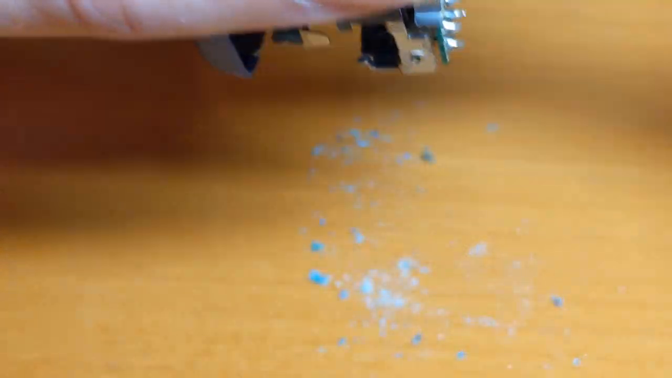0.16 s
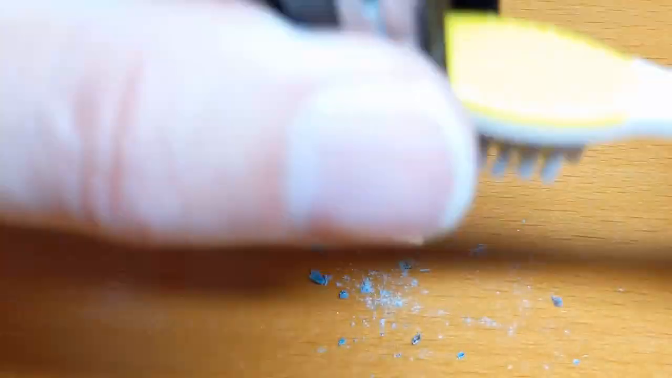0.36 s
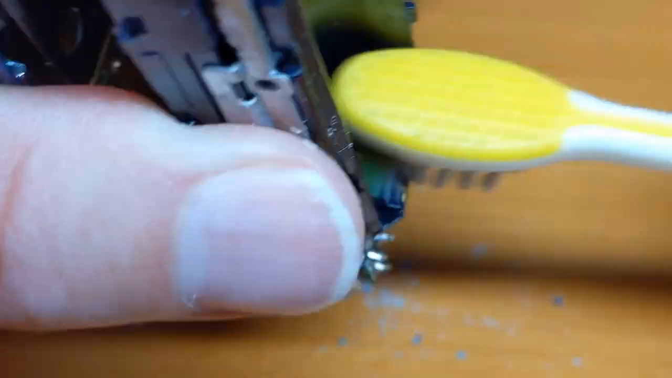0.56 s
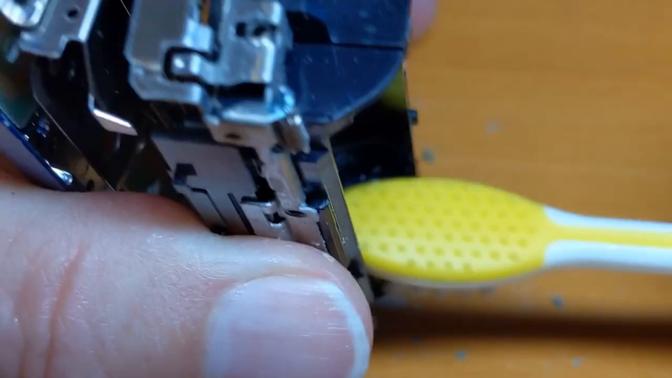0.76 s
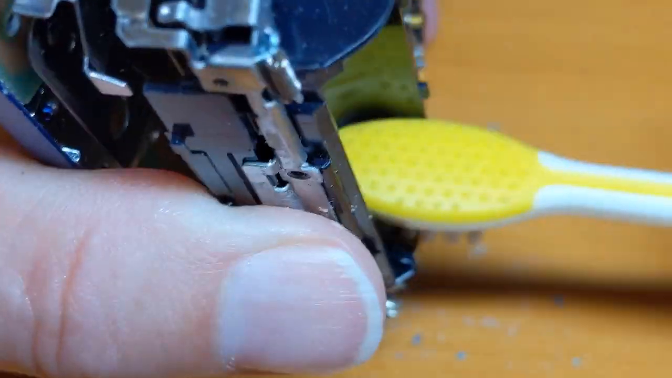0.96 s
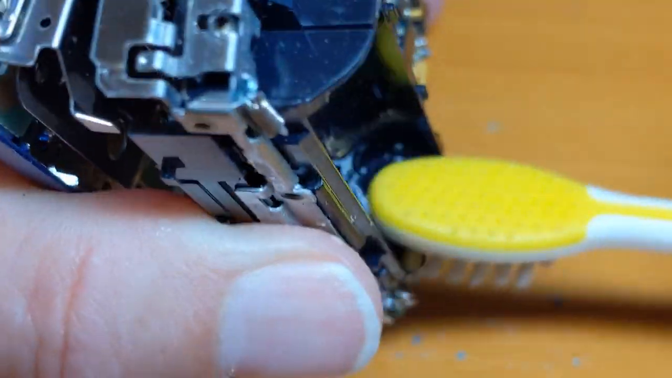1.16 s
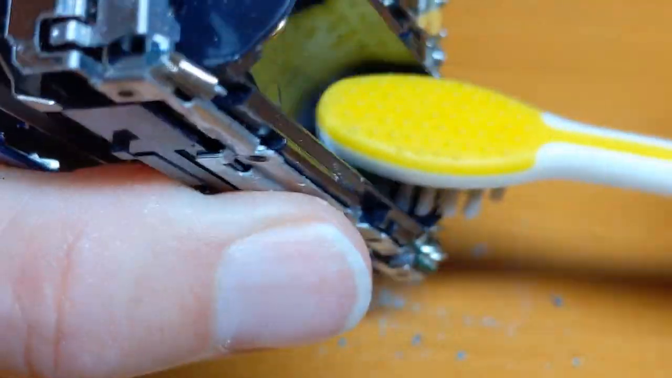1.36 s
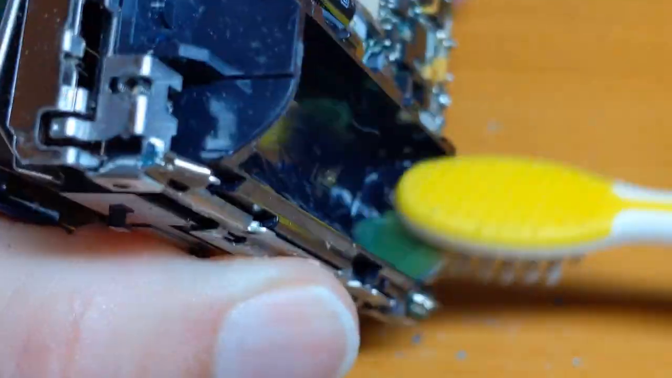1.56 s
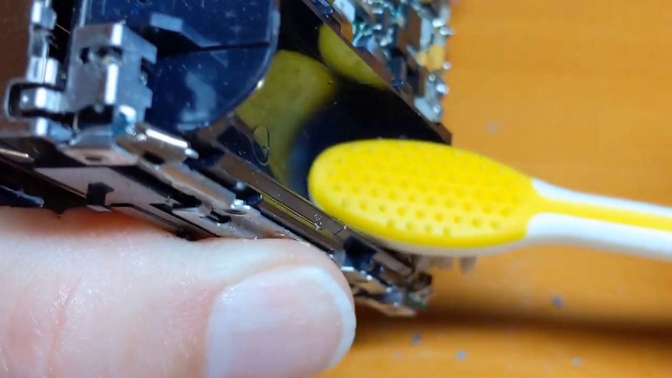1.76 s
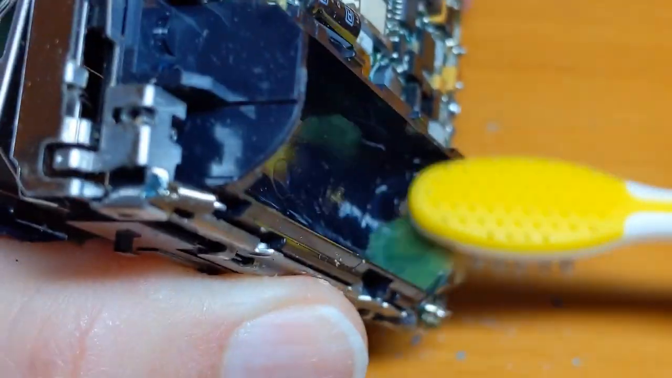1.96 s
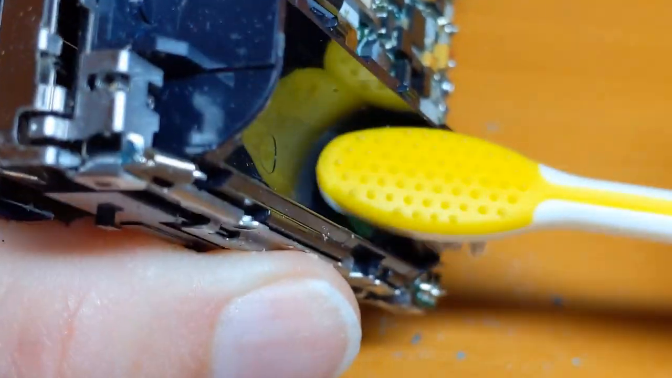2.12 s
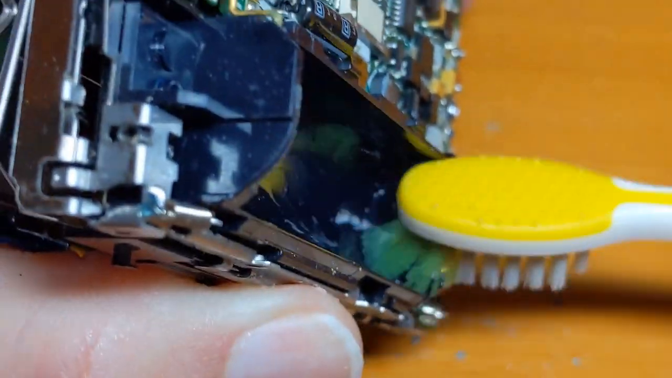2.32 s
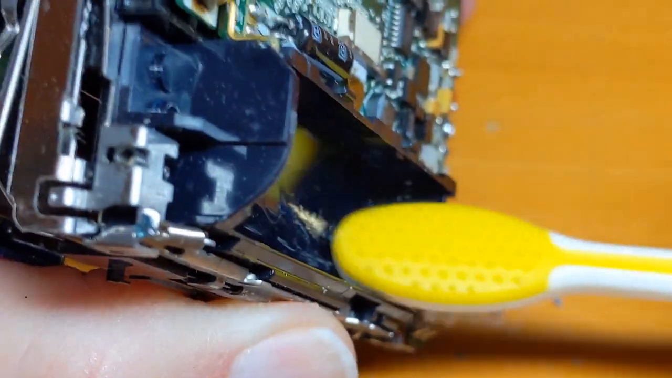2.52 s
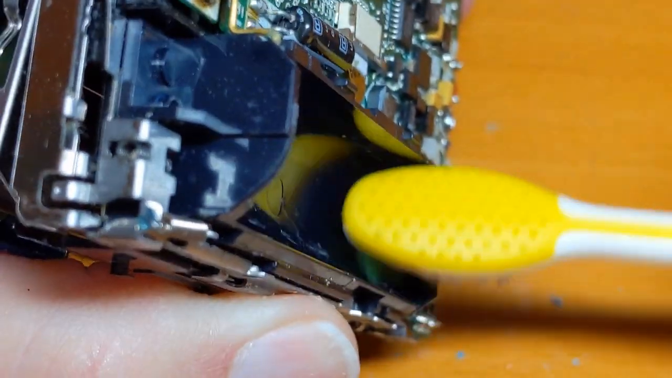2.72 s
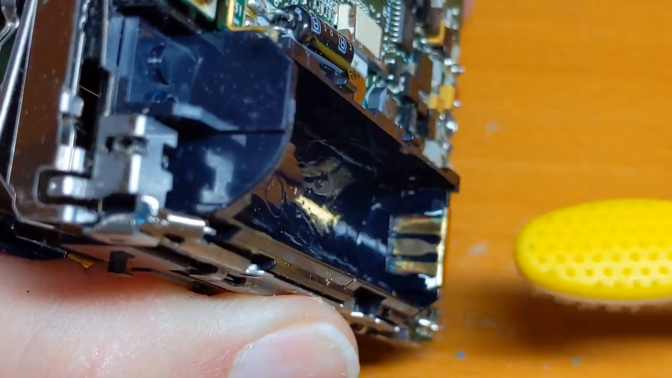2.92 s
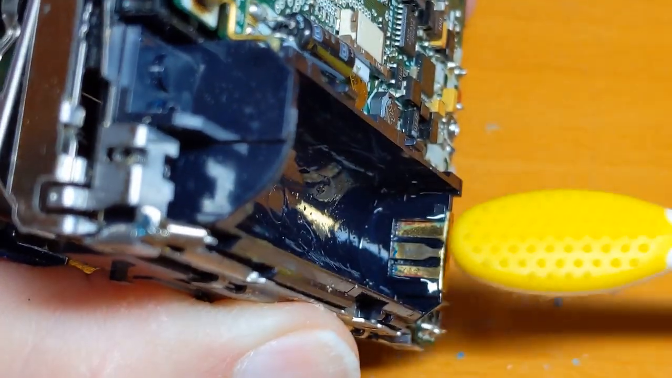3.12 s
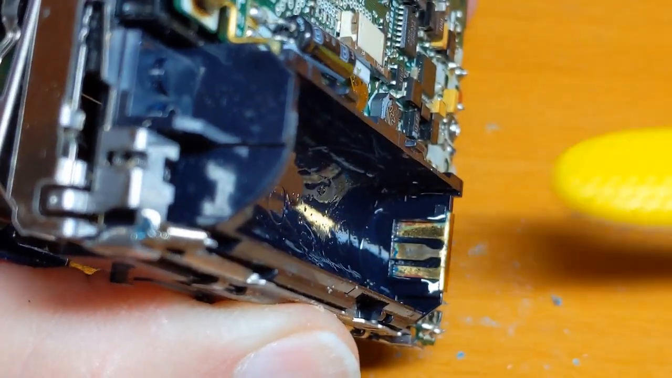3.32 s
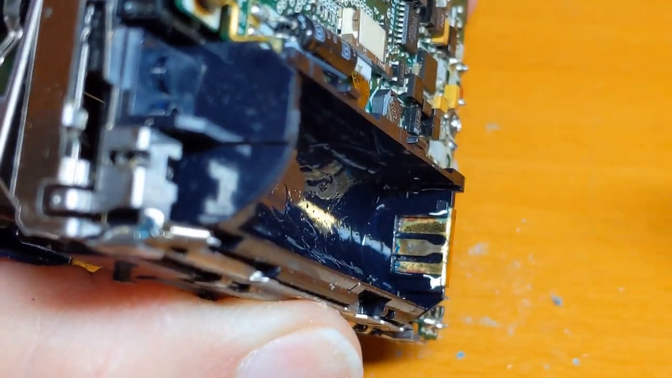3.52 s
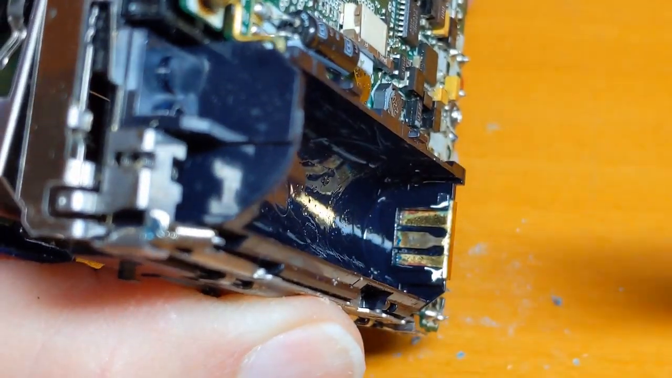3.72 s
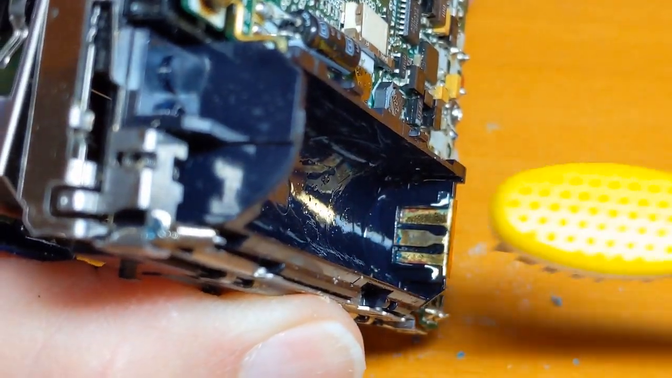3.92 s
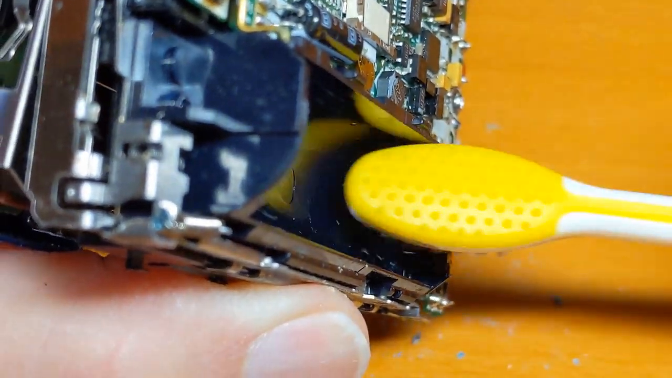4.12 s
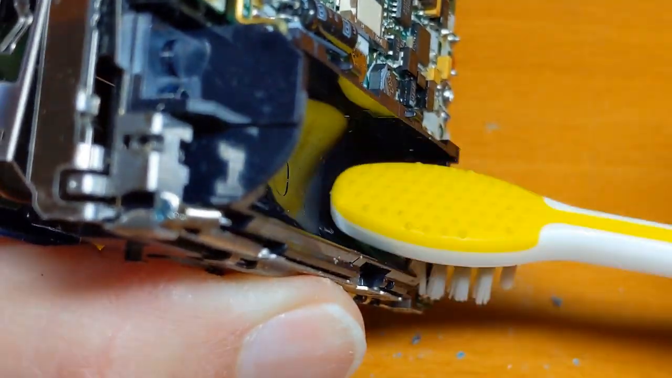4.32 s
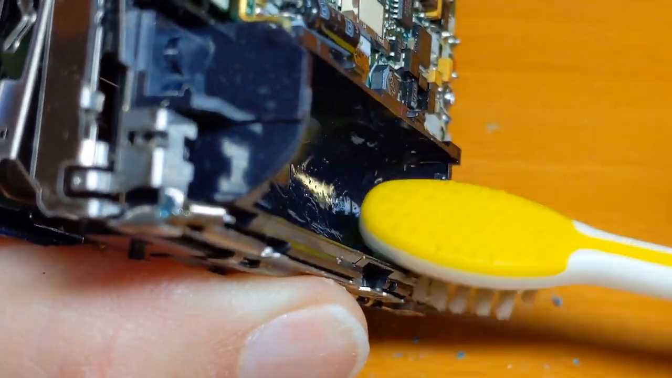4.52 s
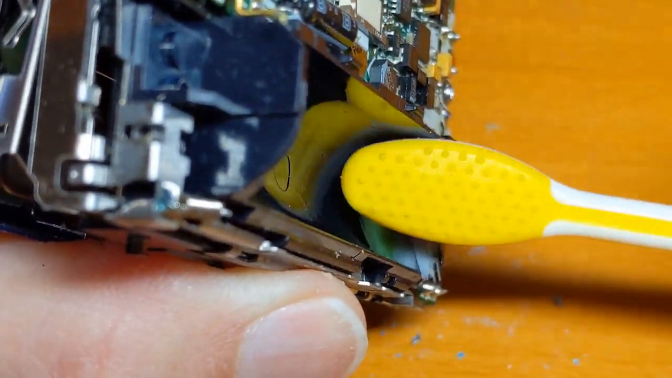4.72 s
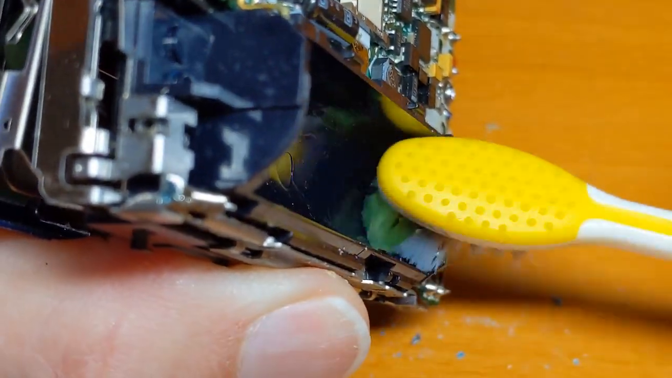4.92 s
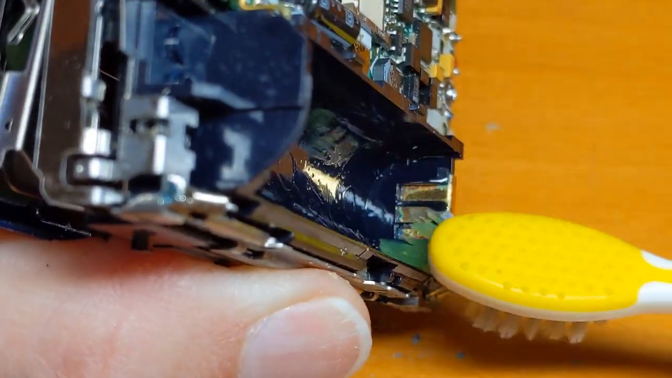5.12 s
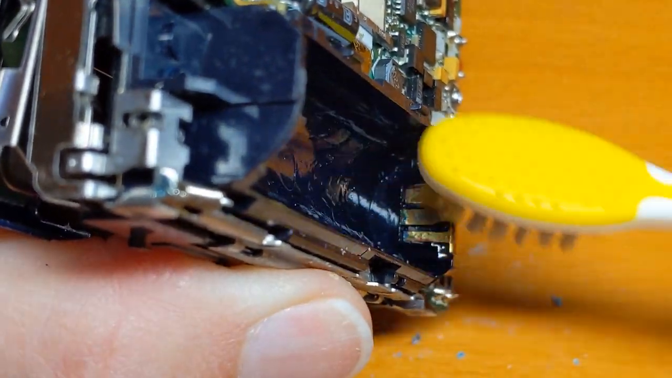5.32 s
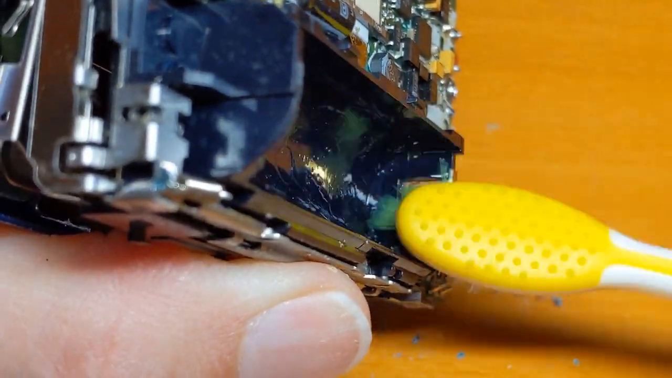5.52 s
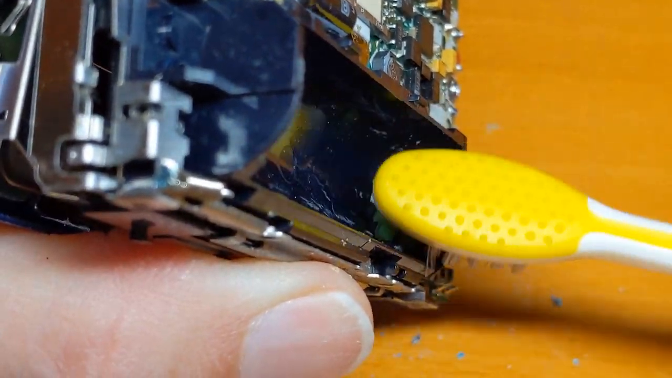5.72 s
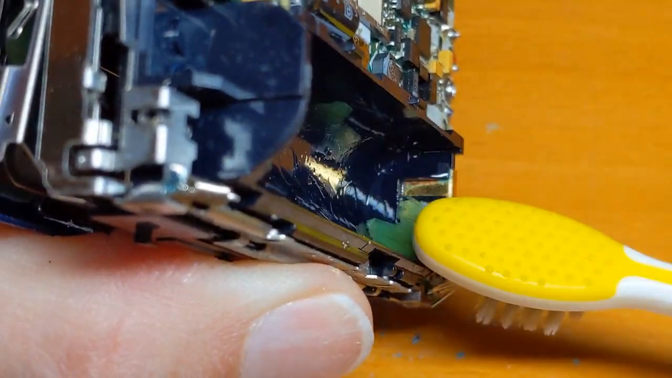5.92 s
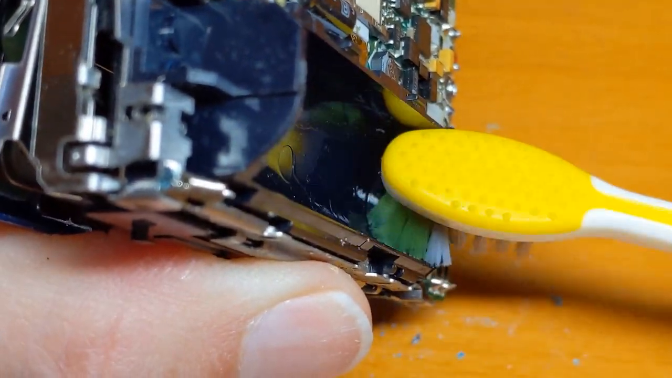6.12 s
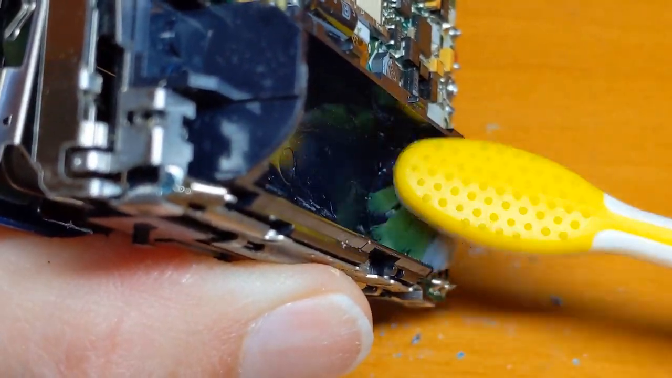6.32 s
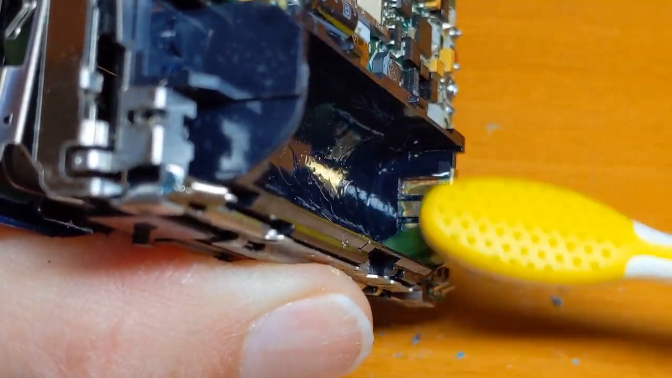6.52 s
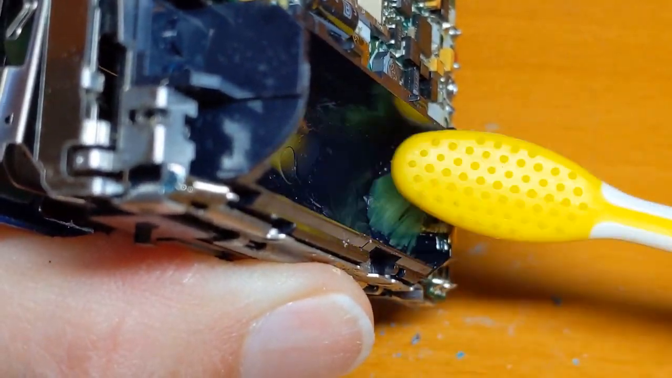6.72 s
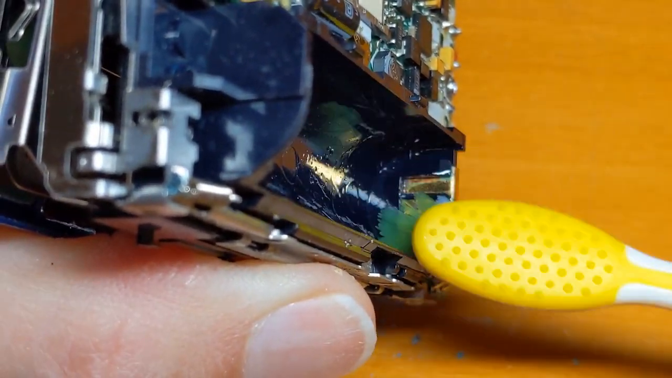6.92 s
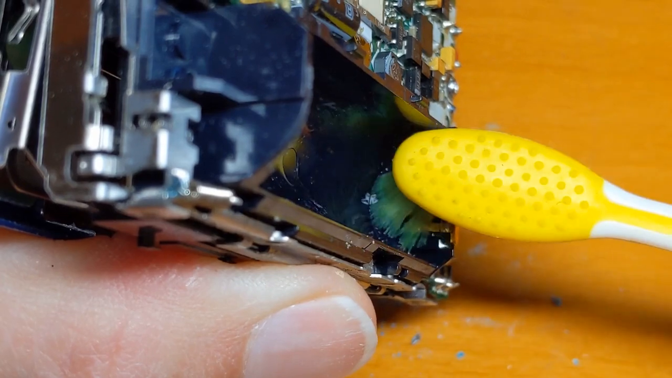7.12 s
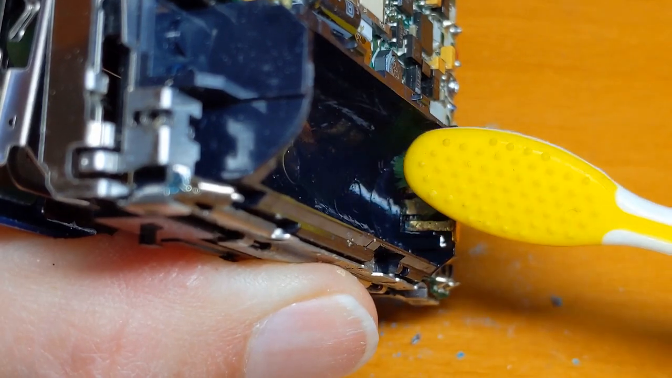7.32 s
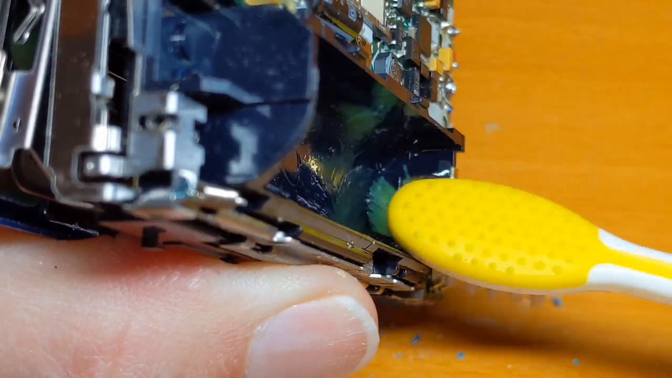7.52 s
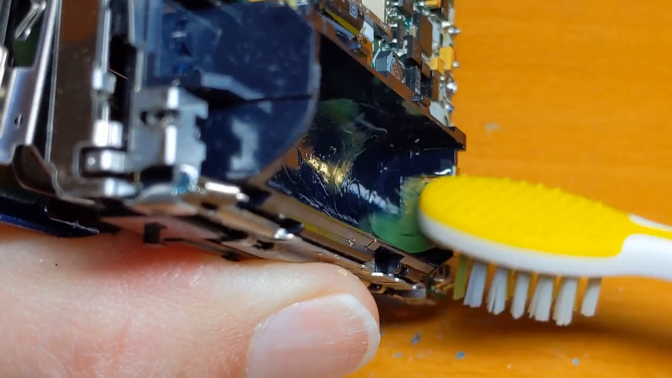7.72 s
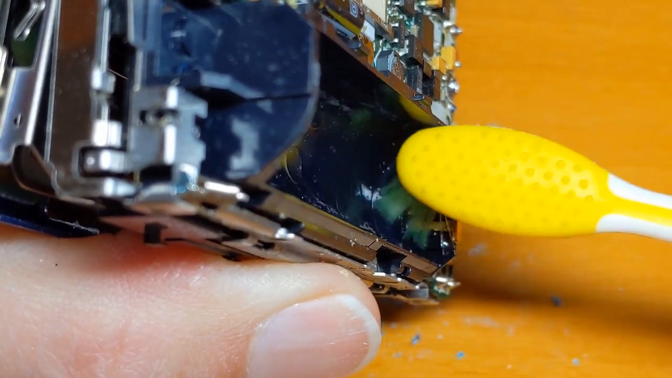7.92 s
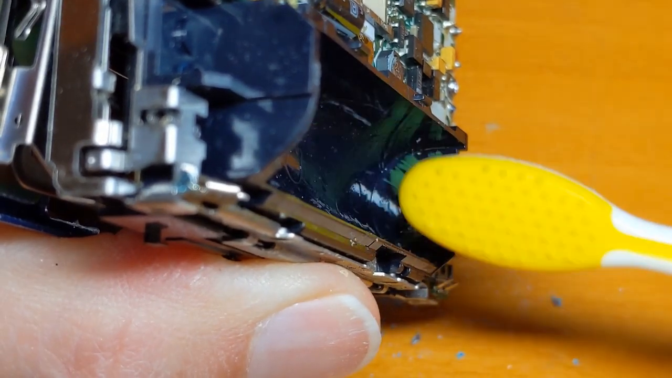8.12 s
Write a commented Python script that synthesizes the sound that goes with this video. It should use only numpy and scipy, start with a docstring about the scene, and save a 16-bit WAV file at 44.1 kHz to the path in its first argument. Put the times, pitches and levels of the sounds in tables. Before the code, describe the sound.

Fast, dry, bright brushing on a small metal chassis, full of ticks and springy clicks, with a pause midway and one wooden bump.

```python
"""A toothbrush scrubs the spring contacts of a small metal chassis held over a wooden bench.
Its bristles snap free at random and set the metal ringing; tufts flick off edges in short showers of snaps.
The head knocks the chassis, plucked springs ring as dying tones, and the chassis once bumps the bench.
The head and bristles chirp briefly as gliding tones. Shaped noise makes a quiet room's hum and hiss."""
import sys
import numpy as np
from scipy import signal
from scipy.fft import rfft, irfft
from scipy.io import wavfile

SR = 44100
rng = np.random.default_rng(int(sys.argv[2]) if len(sys.argv) > 2 else 0)


def waveform_to_disk(signal):
    """Save audio, clipped to [-1, 1], as 16-bit WAV at the path in sys.argv[1]."""
    frames = np.transpose(np.atleast_2d(signal))
    scaled = np.clip(frames, -1, 1) * 32767
    samples = np.round(scaled).astype(np.int16)
    wavfile.write(sys.argv[1], SR, samples)


N = 364266  # length of the sound in samples

# Brush strokes. Each row: start in seconds, end in seconds, scratch level in dB,
# rise from start to end in dB, level in dB while the brush turns afterwards.
STROKES = [(0.0, 0.132, -38.5, 11, -53), (0.198, 0.23, -49, -5, -56), (0.268, 0.383, -49.5, 6.5, -56),
           (0.412, 0.466, -55.5, 1, -61), (0.485, 0.516, -51.5, -2, -69), (0.553, 0.636, -46, 10, -49),
           (0.703, 0.768, -42.5, 0, -56), (0.853, 0.962, -48, 11.5, -50), (1.01, 1.031, -42.5, -5, -51),
           (1.078, 1.136, -42, -1.5, -60), (1.197, 1.373, -47, 3, -57.5), (1.46, 1.526, -41.5, 3, -60),
           (1.553, 1.581, -42.5, 9, -52), (1.672, 1.755, -41, 3, -56), (1.793, 1.894, -43, 2, -50),
           (1.906, 1.977, -44, -13, -55), (2, 2.07, -42.5, 7, -41.5), (2.092, 2.132, -41, 9, -50),
           (2.176, 2.239, -43, 7, -50), (2.279, 2.353, -42.5, 1, -47), (2.355, 2.49, -45, 2, -57),
           (2.554, 2.626, -44, -10, -52), (2.634, 2.73, -45.5, -8, -62), (2.75, 2.802, -48.5, 3, -58),
           (2.843, 2.962, -47, 3, -85), (4.23, 4.351, -55, -1.5, -49), (4.372, 4.478, -45.5, -3, -50),
           (4.485, 4.558, -50, 4.5, -50), (4.591, 4.639, -48, -6, -60.5), (4.696, 4.816, -45, -2.5, -47),
           (4.86, 4.988, -48, -7, -53), (5.091, 5.394, -42, -1, -74), (5.523, 5.56, -53, -6, -65),
           (5.598, 5.613, -32.5, -7, -46), (5.628, 5.682, -40.5, -6, -53), (5.69, 5.726, -45, 3, -87),
           (5.862, 5.888, -46.5, -10, -58), (5.927, 5.985, -44.5, 6, -49), (6.025, 6.051, -48, -15, -56),
           (6.111, 6.148, -51.5, 1, -50.5), (6.187, 6.235, -47, 6.5, -61), (6.265, 6.287, -48, 3, -58.5),
           (6.34, 6.403, -54, 3, -57.5), (6.482, 6.612, -43, 11, -64), (6.635, 6.807, -46, 0.5, -59.5),
           (6.874, 6.979, -48.5, 7.5, -46), (6.98, 7.037, -47.5, -10, -78), (7.068, 7.219, -49, 1, -61.5),
           (7.318, 7.362, -47.5, -3, -61.5), (7.394, 7.466, -48.5, -9.5, -64),
           (7.51, 7.553, -53.5, 13, -52.5), (7.588, 7.663, -49, -5, -68), (7.693, 7.785, -49.5, 3, -68),
           (7.858, 7.985, -45, 0.5, -54.5), (8.035, 8.165, -48, -4, -62)]
# The louder tufts flicking off an edge. Each row: time in seconds, level in dB, contact struck in Hz,
# frame spot struck in Hz, bristle and frame parts in dB against the level, length of the shower in seconds.
FLICKS = [(0.0303, -26.5, 8210, 4240, -8, -23, 0.011), (0.0693, -29, 7800, 3960, -15, -14, 0.0075),
          (0.1056, -13, 9100, 4130, -9, -22, 0.0076), (0.301, -20, 7300, 2590, -26, -13.5, 0.0091),
          (0.3048, -14, 7200, 2680, -22, -23.5, 0.018), (0.387, -34, 6810, 2230, -21, -15, 0.011),
          (0.6027, -17, 4950, 2720, -16, -18, 0.0099), (0.7349, -23, 7850, 3600, -15, -15, 0.0084),
          (0.7517, -18, 7350, 3790, -11, -15.5, 0.011), (0.8897, -35, 9070, 3610, -8, -16, 0.0074),
          (0.952, -24.5, 5980, 3810, -15, -21.5, 0.011), (1.016, -15, 9300, 2600, -7, -17, 0.0075),
          (1.0638, -29, 5930, 2740, -18, -13.5, 0.011), (1.1019, -28, 6660, 2740, -7, -12, 0.013),
          (1.1166, -18, 7200, 2840, -8, -16, 0.01), (1.505, -32, 5790, 2860, -10, -9.5, 0.0094),
          (1.5519, -29, 8020, 2550, -15, -21, 0.011), (1.7182, -27, 6580, 3800, -7, -26, 0.012),
          (1.7365, -16.5, 6650, 4070, -9, -19, 0.013), (1.85, -24.5, 6590, 3670, -18, -21, 0.017),
          (1.8668, -21.5, 5990, 2220, -12, -17, 0.014), (2.0841, -26, 8590, 3400, -15, -14.5, 0.011),
          (2.1824, -34, 6060, 2890, 0, -21, 0.011), (2.201, -31, 6560, 3170, -13, -15, 0.013),
          (2.3935, -33, 9080, 2210, 1, -19, 0.011), (2.461, -20.5, 7790, 4020, -11, -22.5, 0.012),
          (2.4754, -19.5, 6600, 3170, -20, -30, 0.018), (2.5394, -21, 7650, 3270, -10, -29, 0.0075),
          (2.602, -19, 8100, 3740, -10, -18, 0.0081), (2.6863, -25.5, 5340, 1530, -25, -12.5, 0.01),
          (2.7202, -26, 6600, 1540, -14, -17, 0.0091), (2.766, -28.5, 6680, 3280, -15, -27, 0.011),
          (2.8025, -29.5, 7140, 2580, -13, -19, 0.011), (2.906, -25.5, 8700, 3820, -16, -21, 0.0037),
          (2.9209, -19, 5990, 3800, -10.5, -12.5, 0.01), (2.9482, -23, 8550, 3430, -15, -14.5, 0.0086),
          (3.8375, -50, 5600, 2310, -17, -17, 0.011), (4.2437, -25, 5260, 2900, -24, -20, 0.0082),
          (4.3114, -23, 7250, 2580, -6, -13.5, 0.0096), (4.3818, -25.5, 8230, 2620, -7, -23, 0.012),
          (4.4263, -25, 6900, 2090, -11, -12, 0.017), (4.5291, -26, 7720, 3810, -6, -31, 0.011),
          (4.5456, -22, 7500, 2130, -10, -24, 0.01), (4.5867, -29, 8210, 2640, -12, -21.5, 0.012),
          (4.701, -35, 8220, 3810, -9, -9, 0.008), (4.7561, -23, 7200, 2240, -11, -22, 0.0097),
          (4.887, -34, 8100, 3930, -6, -22, 0.011), (4.8964, -35, 6250, 3330, -11, -27, 0.011),
          (4.9054, -33.5, 8090, 4080, -3, -21, 0.011), (4.9162, -28, 6100, 3190, -10, -21, 0.0098),
          (4.9247, -35, 8380, 3150, -11, -21, 0.0083), (5.1487, -26.5, 8510, 2750, -7, -25, 0.013),
          (5.1744, -28, 8160, 3220, 1, -25, 0.012), (5.2145, -22.5, 5930, 3080, -10, -24, 0.011),
          (5.2475, -23, 6000, 3580, -19, -22, 0.0086), (5.2845, -26.5, 8090, 3200, -11, -18.5, 0.009),
          (5.5048, -10.5, 4900, 3770, -11, -17.5, 0.0051), (5.5953, -5.5, 8200, 4100, -12, -21.5, 0.016),
          (5.6346, -14.5, 8260, 3220, -13, -27, 0.011), (5.6483, -27, 9120, 3230, -2, -29, 0.011),
          (5.665, -17.5, 9340, 3200, -8, -26, 0.012), (5.7094, -23, 7310, 3830, -12, -34, 0.012),
          (5.8482, -28, 8210, 3250, -10, -12, 0.014), (5.8549, -14.5, 8170, 2640, -12, -16, 0.0086),
          (5.8641, -13.5, 8240, 2550, -13, -24, 0.0089), (5.932, -28.5, 8200, 2080, -16, -30, 0.011),
          (5.9431, -25.5, 8170, 3980, -16, -27, 0.011), (6.1167, -31.5, 8280, 3090, -3, -23, 0.011),
          (6.2751, -31, 8490, 3370, -10, -18, 0.0077), (6.3598, -32, 7980, 3820, -9, -30, 0.01),
          (6.4242, -29, 5940, 2570, -16, -25, 0.011), (6.5196, -14.5, 6200, 2240, -11, -11, 0.012),
          (6.5535, -22, 8220, 2170, -11, -21, 0.0094), (6.7057, -25.5, 8250, 3190, -10, -31, 0.012),
          (6.7188, -24.5, 7530, 2730, -8, -26, 0.012), (6.7328, -20, 6830, 2420, -7, -25, 0.011),
          (6.9622, -22.5, 5740, 3500, -7, -29, 0.007), (6.9708, -24, 9080, 1930, -13, -7.5, 0.0076),
          (7.0728, -27.5, 5910, 3060, -5, -20, 0.0081), (7.1402, -32, 8340, 3290, -5, -30, 0.011),
          (7.1523, -30, 5970, 1980, -6, -26, 0.011), (7.1744, -22.5, 6750, 4310, -8, -23, 0.0087),
          (7.3972, -28, 7250, 3210, -11, -31, 0.013), (7.4637, -36, 8230, 2460, -8.5, -23, 0.011),
          (7.614, -9.5, 6150, 3560, -11.5, -13, 0.0078), (7.658, -31, 8250, 2150, -10, -24, 0.011),
          (7.674, -20.5, 8230, 3580, -12, -38, 0.0077), (7.7014, -27, 8070, 2170, -9, -29, 0.0086),
          (7.7237, -9, 8170, 4310, -19, -33, 0.0071), (7.748, -27.5, 8330, 4490, -9, -19, 0.0084),
          (7.777, -33, 8090, 2920, -13, -27, 0.011), (7.7967, -37, 8150, 2100, -13, -22, 0.011),
          (7.8383, -35, 8090, 3010, -10, -23, 0.01), (7.8605, -34, 5940, 1600, -7, -26, 0.01),
          (7.879, -23, 8500, 3820, -5, -32, 0.011), (7.9064, -23, 8250, 3770, -6.5, -35, 0.014),
          (7.9546, -27, 8700, 1610, -14, -19, 0.011), (8.1207, -31, 6110, 3100, -7, -26, 0.012)]
# Brush head knocking the chassis. Each row: time in seconds, level in dB, hollow part in dB against it.
KNOCKS = [(0.106, -24, -3), (0.3, -28, -19), (0.601, -24, -6), (0.752, -20, -28), (1.015, -21, -11),
          (1.063, -28.5, -27), (1.116, -22, -36), (1.373, -30.5, -15), (1.504, -28.5, -14),
          (1.737, -22, -13), (1.869, -25.5, -31), (2.136, -30.5, -27), (2.227, -30.5, -30),
          (2.58, -36.5, -21), (2.603, -24.5, -29), (2.804, -31.5, 1), (2.919, -30, -13), (2.949, -32, -9),
          (4.243, -38, -9), (4.312, -26.5, -4), (4.429, -43.5, 12), (4.757, -27, -0.5), (5.247, -36, -4),
          (5.504, -33.5, 0), (5.596, -40, 9), (5.639, -44, 11.5), (5.856, -28, 0), (5.865, -28.5, 3.5),
          (6.52, -21.5, -13), (6.548, -28.5, -8), (6.735, -20, -6), (6.972, -26, -9), (6.99, -32.5, 2.5),
          (7.177, -29.5, -3.5), (7.615, -16.5, -13.5), (7.64, -32, -18), (7.711, -40.5, 9), (7.768, -44, 5),
          (7.954, -33, 0.5)]
# Chassis bumping the bench. Each row: time in seconds, level in dB.
BUMPS = [(2.6846, -15)]

# Ringing modes of each part. Each row: pitch in Hz, width in Hz (wider dies sooner), relative strength in dB.
CONTACT_MODES = [(4965, 600, -11), (5915, 517, -6.5), (6700, 610, -5.5), (7310, 1050, -2), (8250, 630, -3),
                 (9200, 700, -5.5)]
BRISTLE_MODES = [(10780, 840, -2.5), (11780, 680, -5), (12900, 1230, -3.5), (14300, 1400, -1),
                 (14960, 820, -4)]
FRAME_MODES = [(1710, 440, -4.5), (2030, 354, 2.5), (2135, 256, 2.5), (2650, 580, 5.5), (3180, 460, 4.5),
               (3700, 397, 4), (4150, 330, -5)]
SHELL_MODES = [(900, 300, -6), (1160, 220, 0), (1450, 350, -5)]
HOLLOW_MODES = [(333, 90, -11), (466, 71, -7), (595, 252, -0.5), (746, 160, -6)]
BENCH_MODES = [(128, 12.6, -15), (339, 30, -9), (454, 71, 0), (524, 74, 4), (662, 100, 3.5), (870, 170, 6),
               (1080, 100, 5.5), (1320, 140, 3.5), (1514, 110, -2.5), (1850, 220, -13), (2200, 220, -15)]

# Colour of the quiet room. Each row: frequency in Hz, relative strength in dB per Hz.
ROOM_TONE = [(15, -53), (25, -8), (53, -4), (102, -5), (270, -7), (344, -5), (439, -15), (516, -9.5),
             (659, -15.5), (840, -11.5), (1160, -18), (1890, -22), (9570, -29.5), (10400, -28),
             (16000, -32)]
ROOM_TONE_DB = -57.5
# A faint thin whistle. Each row: pitch in Hz, distance to each band edge in Hz, level in dB.
WHISTLES = [(10029, 40, -81.5)]
# Plucked spring tongues. Each row: time in seconds, pitch in Hz, starting level in dB,
# time to die by 60 dB in seconds.
PINGS = [(0.303, 2710, -40, .05), (0.605, 2870, -34, 0.02), (1.016, 2585, -32, 0.04),
         (1.118, 2860, -36.5, 0.027), (1.238, 2130, -48.5, .025), (1.373, 2640, -47, 0.05),
         (2.805, 2570, -47, .04), (4.244, 2955, -44.5, 0.12), (4.245, 5130, -49, .15),
         (5.505, 1640, -33, 0.022), (5.504, 5050, -26.5, 0.023), (5.709, 7320, -36, 0.056),
         (6.52, 2140, -41, 0.045), (7.615, 1980, -29, 0.023)]
# How the brush sits on the contacts. Each row: time in seconds, bristle hiss in dB against the scratch,
# relative drag on the frame in dB, most excited contact in Hz.
GRIP = [(0.05, -0.5, -14.5, 8200), (0.35, -2, -9, 7300), (0.9, -1, -9, 6900), (1.3, -0.5, -12.5, 6950),
        (1.9, -3, -13.5, 6260), (2.4, -1.5, -15, 6160), (2.6, -4, -13.5, 6800), (2.95, 0, -6.5, 6340),
        (4.3, -1.5, -3, 6500), (4.6, 2, -11.5, 8200), (5.0, -0.5, -10, 8200), (5.1, 1, -8, 6100),
        (5.5, -1, -14, 5600), (5.62, -2, -11, 8400), (6.2, 1.5, -8, 8500), (7.0, -3.5, -8.5, 8200),
        (7.2, -3.5, -19.5, 8340), (7.7, -0.6, -1, 7550), (8.1, -3, -12, 8100)]
# Stick-slip chirps. Each row: start in seconds, length in seconds, first pitch in Hz, pitch it settles to in Hz,
# level in dB, second harmonic in dB against the first.
SQUEAKS = [(1.285, .07, 3520, 3400, -59, -30), (6.757, .028, 1950, 1050, -43, -18),
           (6.783, .009, 940, 940, -59, 6), (6.792, .012, 720, 750, -58, 7),
           (6.803, .011, 950, 920, -55, 2), (6.815, .026, 870, 950, -49, -4)]

SNAPS_PER_S, SNAP_SPREAD_DB = 2500., 5  # basic rate, before touch and clumping change it
CATCH_S, LIFT_S = 0.014, 0.011  # longest times for a stroke to set in and let go
ARCH_DB = 2.5  # a stroke is this much softer at its ends than in its middle, besides its rise
# Small flicks come by chance, their level following the stroke.
SMALL_PER_S, SMALL_OVER_DB, SMALL_SPREAD_DB = 12, 12.5, 3
SMALL_BRIGHT_DB, SMALL_FRAME_DB, SMALL_LENGTH_S = -10, -18.5, 0.014
KNOCK_RATTLE_DB, KNOCK_RATTLE_T60_S = -12.5, 0.082  # loose parts shake after each knock
# Settling time of the chirp's pitch, fade at both ends, third harmonic against the second.
GLIDE_S, CHIRP_EDGE_S, THIRD_DB = .009, .005, -20
ROOM_DB, ROOM_T60_S, ROOM_CUT_HZ = -13.5, 0.22, 3300  # echo level, dying time, treble limit
CUTOFF_HZ = 16000


def from_db(db):
    """Turn decibels into a plain factor."""
    return np.exp(np.asarray(db) * np.log(10) / 20)


def rms_one(x):
    """Scale a signal to an average strength (rms) of 1."""
    return x / np.sqrt(np.mean(x ** 2) + 1e-20)


def in_time(rows):
    """Join the points of each column with straight lines over time."""
    s, *columns = np.transpose(rows)
    return [np.interp(np.arange(N) / SR, s, c) for c in columns]


def drift(rate_hz):
    """Slow random wandering with a spread of 1, made at an eighth of the sample rate."""
    r = np.exp(-16 * np.pi * rate_hz / SR)
    noise = rng.standard_normal(N // 8 + 6000)
    slow = signal.lfilter([1], [1, -2 * r, r * r], noise)[5000:]
    return np.interp(np.arange(N) / 8, np.arange(len(slow)), rms_one(slow))


def body(clicks, modes, vary_db, spot_hz=None, reach=1, wander_db=0):
    """Let each click ring every mode by a random amount, most near the spot (reach is in octaves)."""
    out = 0
    total = np.sum(from_db(np.array(modes)[:, 2]))
    live = np.flatnonzero(clicks)
    for k, (hz, width_hz, db) in enumerate(modes):
        r = np.exp(-np.pi * width_hz / SR)
        w = 2 * np.pi * hz / SR
        if spot_hz is not None:
            octaves_off = np.abs(np.log2(hz / spot_hz[live]))
            db = db - 6.6 * np.minimum(octaves_off / reach, 1)
        if wander_db:
            db = db + wander_db * drift(8.7)[live]
        struck = np.full(N, 1e-18)
        strength_db = db + vary_db * rng.standard_normal(N)[live]
        struck[live] = clicks[live] * from_db(strength_db) * (-1) ** k  # neighbours in opposite sense
        out = out + signal.lfilter([1, 0, -1], [1, -2 * r * np.cos(w), r * r], struck) / 2
    return out / total


def coloured(spectrum):
    """Shape steady noise to a given spectrum, with rms 1."""
    hz, db = np.transpose(spectrum)
    grid = np.maximum(np.fft.rfftfreq(N, 1 / SR), 1)
    gain = from_db(np.interp(np.log(grid), np.log(hz), db))
    return rms_one(irfft(rfft(rng.standard_normal(N)) * gain, N))


def band(x, low_hz, high_hz):
    """Keep only the frequencies between two limits."""
    return signal.sosfilt(signal.butter(2, [low_hz, high_hz], "band", fs=SR, output="sos"), x)


def blows(rows, levels_db):
    """Place one click for each row."""
    clicks = np.zeros(N)
    clicks[[round(row[0] * SR) for row in rows]] = from_db(levels_db)
    return clicks


def stroke_controls():
    """Each stroke sets in, sweeps over a low arch and lets go; the turning brush touches at its own level."""
    rows = []
    for (start, end, db, rise_db, turn_db), after in zip(STROKES, STROKES[1:] + [(N / SR,)]):
        gap = max(after[0] - end, 1e-3)
        rows += [(start, db - rise_db / 2 - ARCH_DB),
                 ((start + end) / 2, db),
                 (end, db + rise_db / 2 - ARCH_DB),
                 (end + min(LIFT_S, gap / 2), turn_db),
                 (after[0] - min(CATCH_S, gap / 4), turn_db)]
    return in_time(rows) + in_time(GRIP)


def scrubbing():
    """Single bristles snap free at random and in clumps; each snap rings contacts, bristles and chassis."""
    db, hiss_db, drag_db, spot_hz = stroke_controls()
    crowd = from_db(.6 * (db + 45))  # a light touch frees fewer bristles, so the rasp thins to ticks
    sizes = from_db(SNAP_SPREAD_DB * np.minimum(rng.exponential(1, N), 3.5))
    sizes = sizes * rng.choice([-1, 1], N)
    born = rng.random(N) < SNAPS_PER_S * crowd * from_db(5.0 * drift(90)) / SR
    rub = 0.34 * rng.standard_normal(N)  # the bristles that slide without catching
    snaps = (sizes * born / np.sqrt(crowd) + rub) * from_db(0.35 * drift(44))

    contacts = rms_one(body(snaps, CONTACT_MODES, vary_db=5.5, spot_hz=spot_hz, reach=1.7, wander_db=1.5))
    bristles = rms_one(body(snaps, BRISTLE_MODES, vary_db=4.0, wander_db=1.7))
    frame = rms_one(body(snaps, FRAME_MODES, vary_db=3.0, wander_db=2.0))
    dull = rms_one(body(snaps, SHELL_MODES + HOLLOW_MODES, vary_db=7.5))
    chassis = frame + from_db(-1) * dull
    mix = contacts + from_db(hiss_db) * bristles + from_db(drag_db - 3.0) * chassis
    return from_db(db) * mix


def room_tone():
    """Steady noise shaped into hum and hiss, with a very narrow band of noise as a thin whistle."""
    whistle = 0
    for hz, width_hz, db in WHISTLES:
        thin = band(rng.standard_normal(N), hz - width_hz, hz + width_hz)
        whistle = whistle + from_db(db) * rms_one(thin)
    return from_db(ROOM_TONE_DB + 0.16 * drift(5.6)) * coloured(ROOM_TONE) + whistle


def small_flicks():
    """Rows like those of FLICKS, scattered over the strokes, near the contact that the brush is working."""
    db, _, _, spot_hz = stroke_controls()
    s = np.cumsum(rng.exponential(1, 300)) / SMALL_PER_S
    spread = rng.standard_normal((300, 4))
    frame_hz = rng.uniform(1600, 3500, 300)
    at = (s[s < N / SR] * SR).astype(int)
    rows = []
    for i, hz, (size, place, bright, frame) in zip(at, frame_hz, spread):
        if db[i] > -62:  # none where the brush barely touches
            rows.append((i / SR, db[i] + SMALL_OVER_DB + SMALL_SPREAD_DB * size, spot_hz[i] * 1.1 ** place, hz,
                         SMALL_BRIGHT_DB + 5 * bright, SMALL_FRAME_DB + 6 * frame, SMALL_LENGTH_S))
    return rows


def flicks():
    """A tuft lets go: a first snap, then a swelling and dying shower from the bristles behind it."""
    trains = np.zeros((3, N + 1400))  # clicks for contacts, bristles and frame
    t = np.arange(1400) / SR
    contact_hz, frame_hz = np.full((2, N), 5000.)
    draws = rng.standard_normal((300, 2, 1400))
    tufts = zip(list(FLICKS) + small_flicks(), draws)
    for row, (size, chance) in sorted(tufts, key=lambda pair: pair[0][0]):
        s, db, *spots_hz, bright_db, frame_db, length_s = row
        shape = (1 - np.exp(-t / 0.00011)) * from_db(-40 * t / np.clip(length_s, .002, .04))
        shower = 0.5 * size * (chance > 1.1) * shape
        shower[0] = 0.69  # the first snap
        at = round(s * SR)
        levels = from_db(db + np.array([0, bright_db, frame_db]))
        trains[:, at:at + 1400] += np.outer(levels, shower)
        contact_hz[at:], frame_hz[at:] = spots_hz  # these spots hold until the next flick
    contacts = body(trains[0, :N], CONTACT_MODES, vary_db=3.0, spot_hz=contact_hz, reach=0.19)
    bristles = body(trains[1, :N], BRISTLE_MODES, vary_db=4.5)
    frame = body(trains[2, :N], FRAME_MODES, vary_db=3.0, spot_hz=frame_hz, reach=0.74)
    return from_db(15.0) * contacts + from_db(16.0) * bristles + from_db(20.0) * frame


def knocks():
    """The plastic head sets the shell and the hollow of the chassis ringing, and loose parts rattle briefly."""
    rows = np.array(KNOCKS)
    loose = from_db(KNOCK_RATTLE_DB) * rng.standard_normal(N) * (rng.random(N) < .02)
    fade = from_db(-60 / (KNOCK_RATTLE_T60_S * SR))  # loss in each sample

    def shaken(clicks):
        """Follow each click with dying random rattles."""
        return clicks + loose * signal.lfilter([0, 1], [1, -fade], clicks + 1e-18)

    shell = body(shaken(blows(rows, rows[:, 1])), SHELL_MODES, vary_db=2.5)
    hollow = body(shaken(blows(rows, rows[:, 1] + rows[:, 2])), HOLLOW_MODES, vary_db=2.5)
    return from_db(1.5) * shell + from_db(5.0) * hollow


def pings():
    """Each plucked tongue rings as a dying tone, roughened by the bristles that still touch it."""
    out = np.zeros(N + SR // 2)
    t = np.arange(SR // 2) / SR
    touch = 1 + .5 * drift(200)
    for s, hz, db, t60 in PINGS:
        at = round(s * SR)
        out[at:at + len(t)] += from_db(db - 60 * t / t60) * np.sin(2 * np.pi * hz * t)
    return out[:N] * touch


def squeaks():
    """Head and bristles stick and slip at a rate that glides and settles, a little unsteady."""
    out = np.zeros(N)
    waver = 1 + 0.022 * drift(200)  # of the pitch
    rough = from_db(3.5 * drift(150))  # of the level
    for s, length_s, first_hz, last_hz, db, second_db in SQUEAKS:
        t = np.arange(round(length_s * SR)) / SR
        at = round(s * SR)
        hz = last_hz + (first_hz - last_hz) * np.exp(-t / GLIDE_S)
        phase = 2 * np.pi * np.cumsum(hz * waver[at:at + len(t)]) / SR
        edge = np.minimum(np.minimum(t, length_s - t) / CHIRP_EDGE_S, 1)
        overtones = np.sin(2 * phase) + from_db(THIRD_DB) * np.sin(3 * phase)
        tone = np.sin(phase) + from_db(second_db) * overtones
        out[at:at + len(t)] += from_db(db) * edge * tone
    return rough * out


def bump():
    """A blow rings the wooden bench, then loose rattles follow as the chassis settles."""
    first = blows(BUMPS, np.array(BUMPS)[:, 1])
    fade = from_db(-np.arange(6000) / SR * 400)  # 400 dB per second
    rattle = 0.2 * (rng.random(6000) < .03) * rng.standard_normal(6000) * fade
    rattle[0] = 1  # the blow itself
    clicks = signal.fftconvolve(first, rattle)[:N]
    return from_db(8.5) * body(clicks, BENCH_MODES, vary_db=1.5)


def room(x):
    """The room answers with a diffuse tail of dying noise, duller than the direct sound."""
    t = np.arange(SR // 2) / SR
    tail = rng.standard_normal(len(t)) * from_db(-60 * t / ROOM_T60_S) * (t > .004)
    tail = signal.sosfilt(signal.butter(1, ROOM_CUT_HZ, fs=SR, output="sos"), tail)
    tail = tail / np.sqrt(np.sum(tail ** 2))
    return from_db(ROOM_DB) * signal.fftconvolve(x, tail)[:N]


def scene():
    """Add all sounds; the room echoes everything but the squeaks and its own tone."""
    struck = scrubbing() + flicks() + knocks() + pings() + bump()
    return (struck + room(struck) + squeaks() + room_tone())[None]


def record(dry):
    """A steep filter cuts the top of the treble."""
    return signal.sosfilt(signal.ellip(10, .5, 55, CUTOFF_HZ, fs=SR, output="sos"), dry)


dry = scene()
out = record(dry)
waveform_to_disk(out)
```